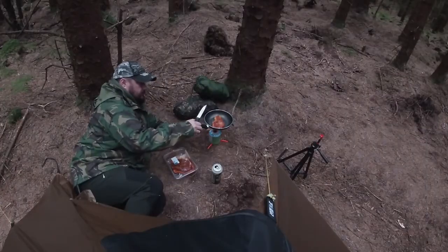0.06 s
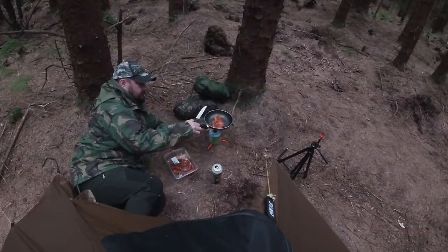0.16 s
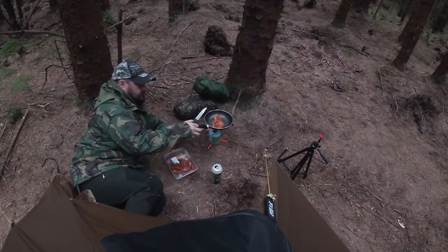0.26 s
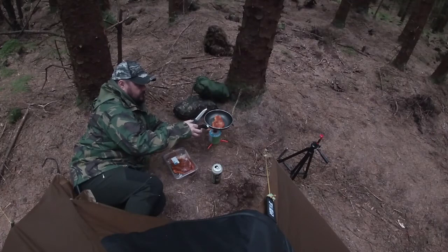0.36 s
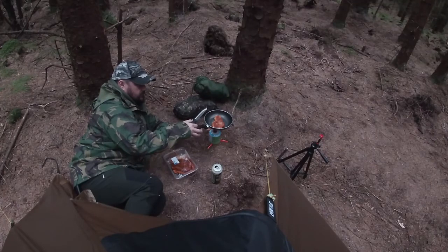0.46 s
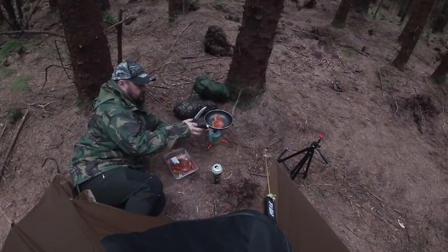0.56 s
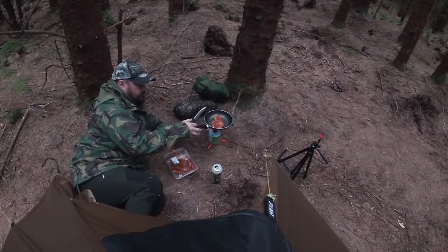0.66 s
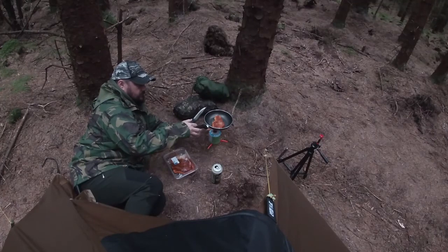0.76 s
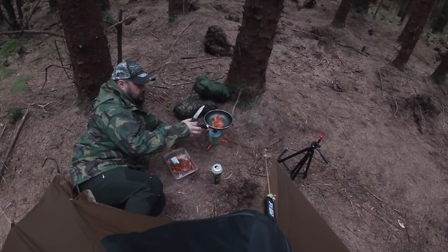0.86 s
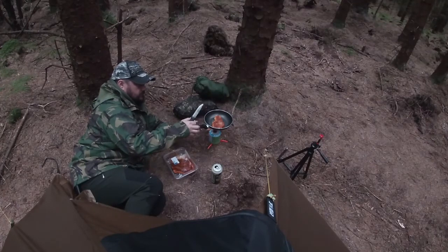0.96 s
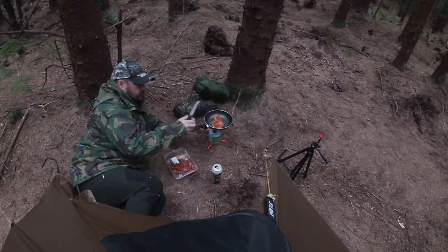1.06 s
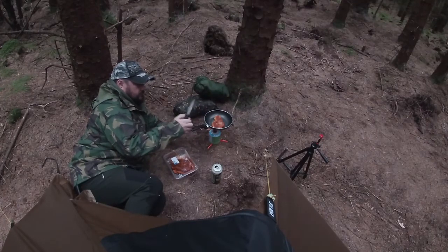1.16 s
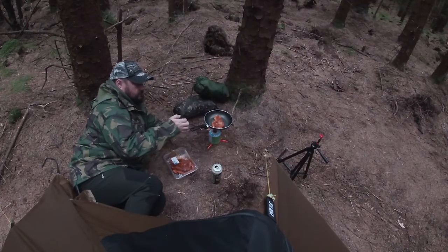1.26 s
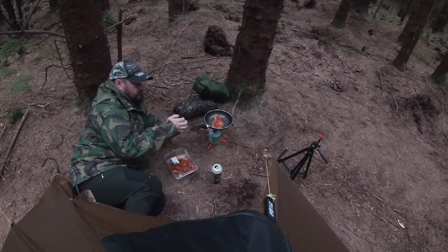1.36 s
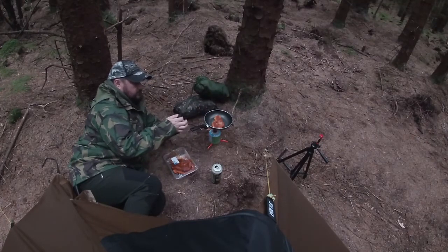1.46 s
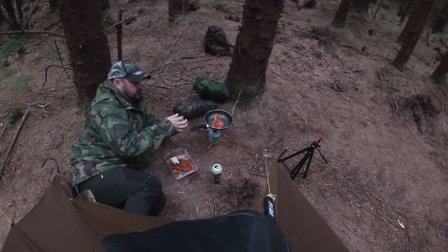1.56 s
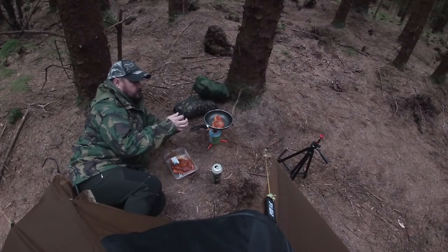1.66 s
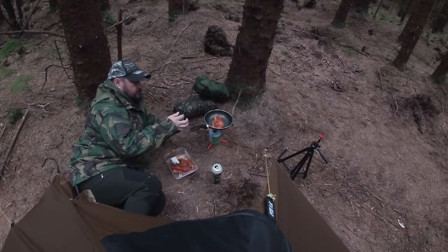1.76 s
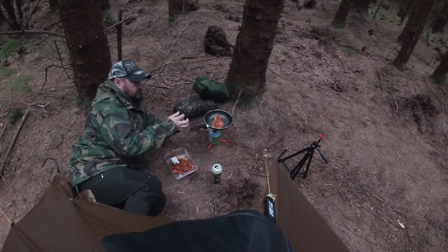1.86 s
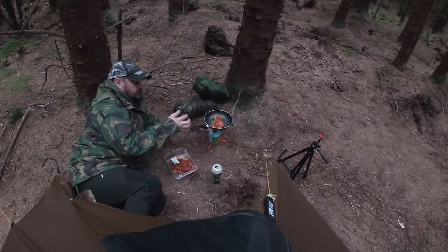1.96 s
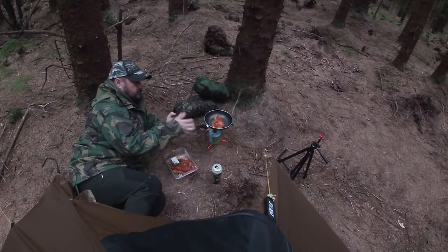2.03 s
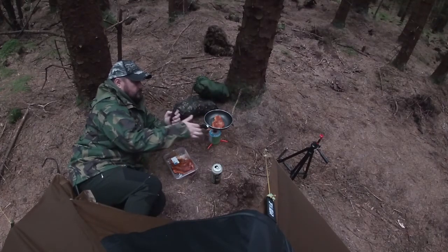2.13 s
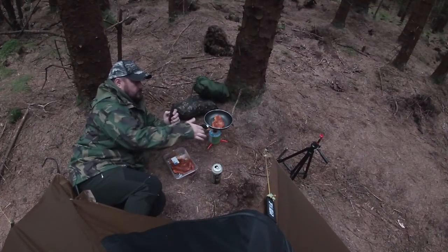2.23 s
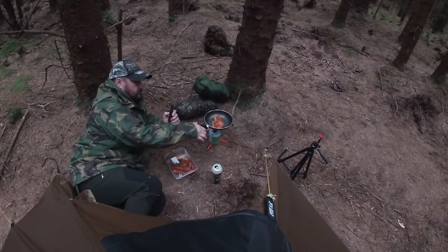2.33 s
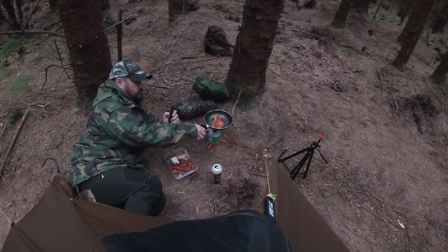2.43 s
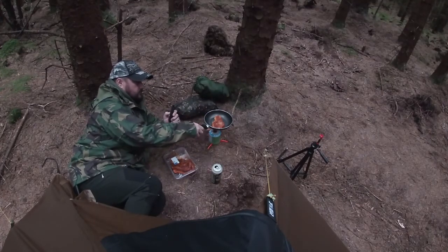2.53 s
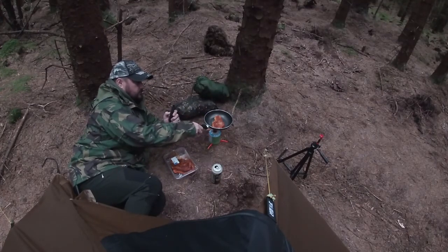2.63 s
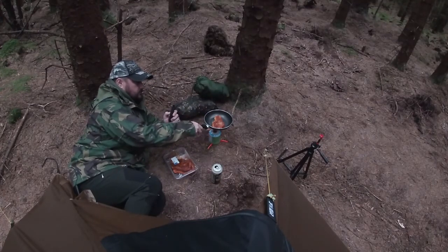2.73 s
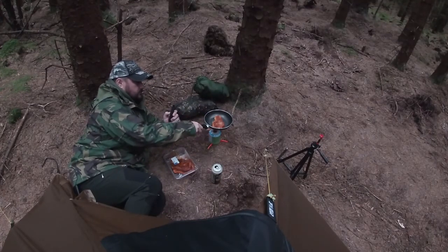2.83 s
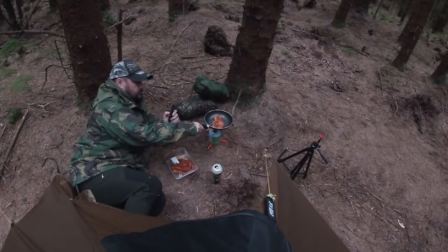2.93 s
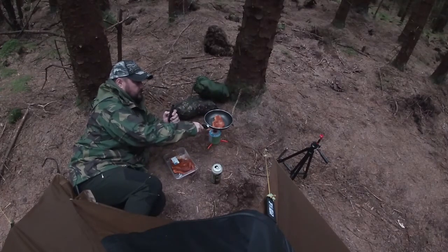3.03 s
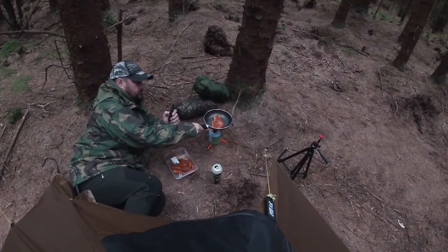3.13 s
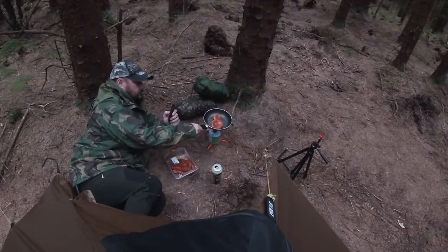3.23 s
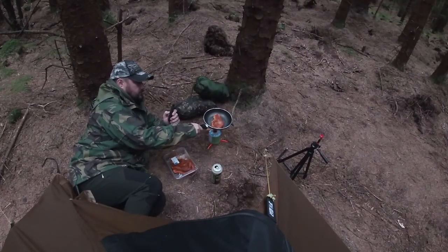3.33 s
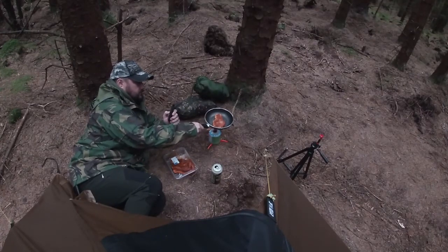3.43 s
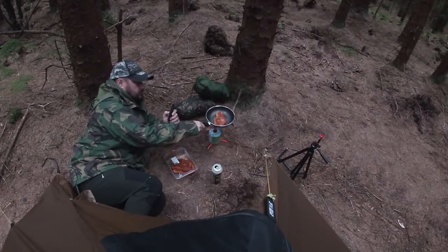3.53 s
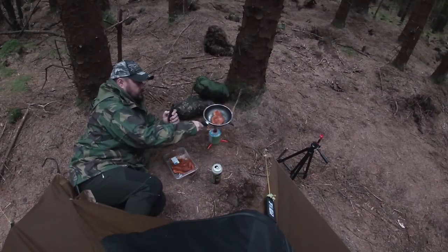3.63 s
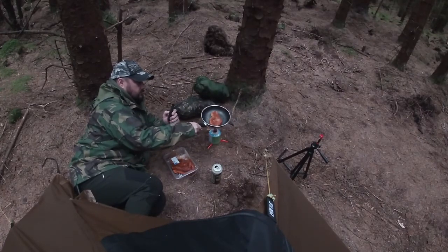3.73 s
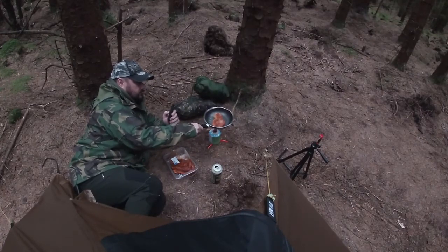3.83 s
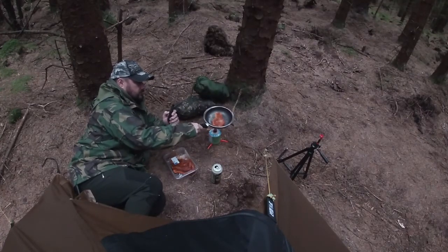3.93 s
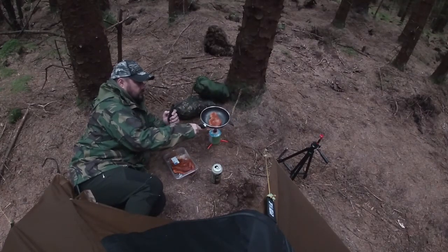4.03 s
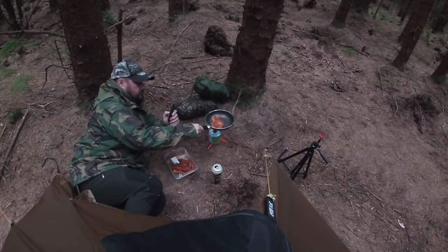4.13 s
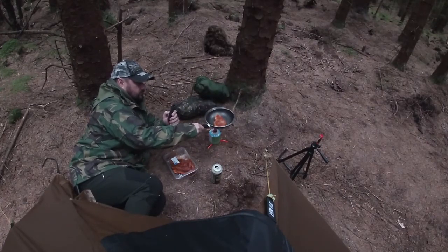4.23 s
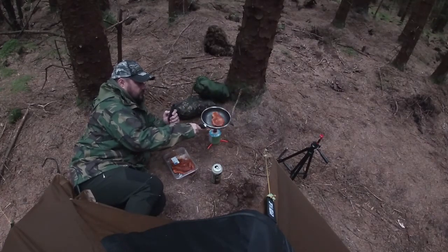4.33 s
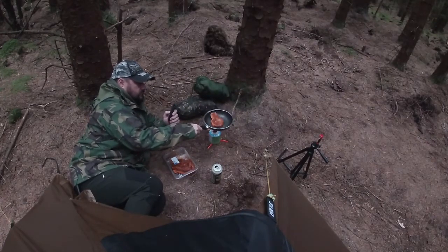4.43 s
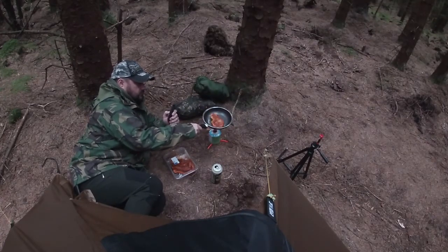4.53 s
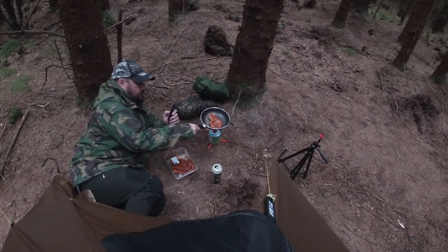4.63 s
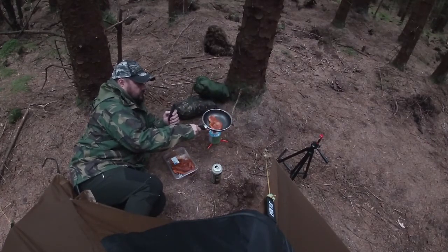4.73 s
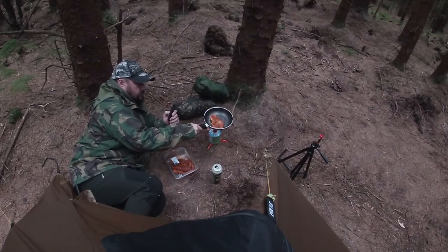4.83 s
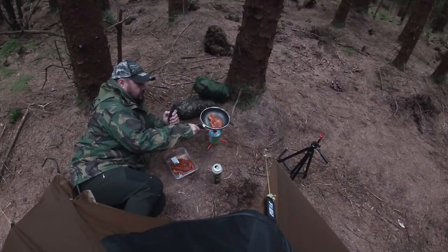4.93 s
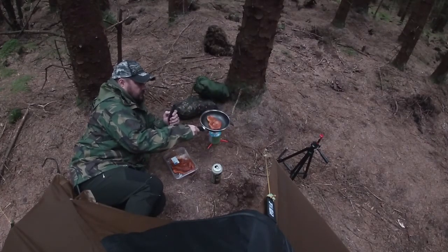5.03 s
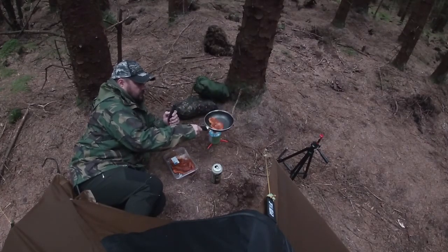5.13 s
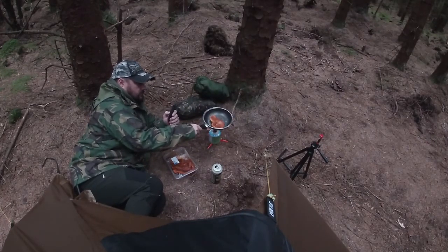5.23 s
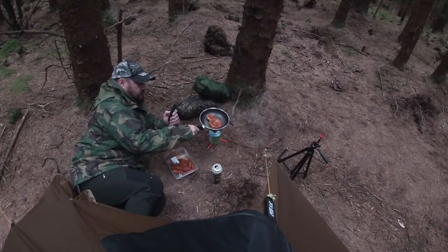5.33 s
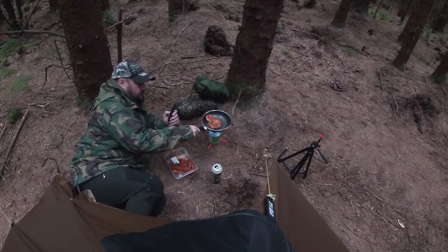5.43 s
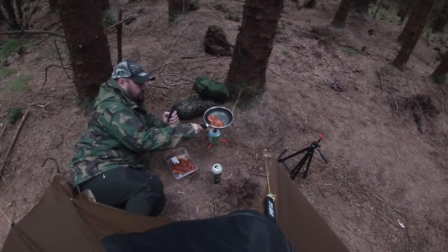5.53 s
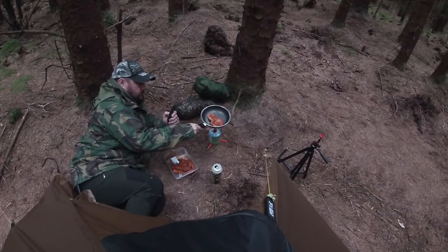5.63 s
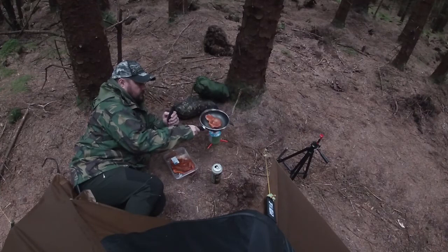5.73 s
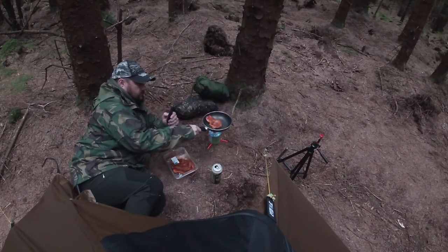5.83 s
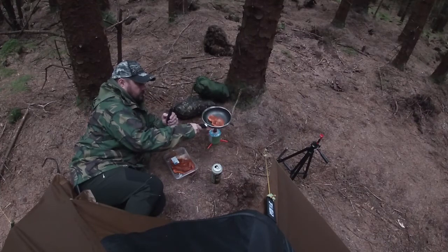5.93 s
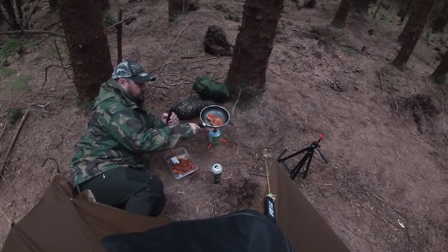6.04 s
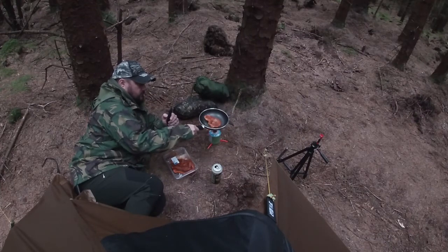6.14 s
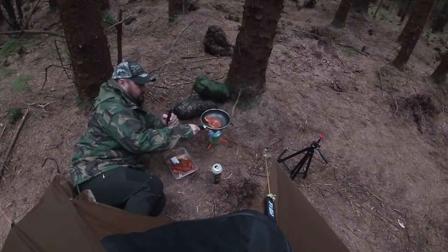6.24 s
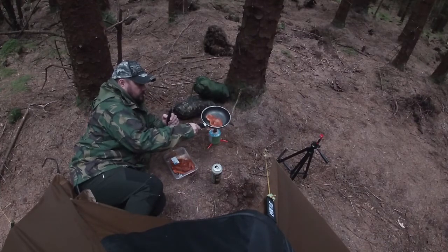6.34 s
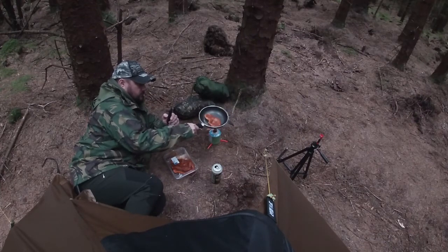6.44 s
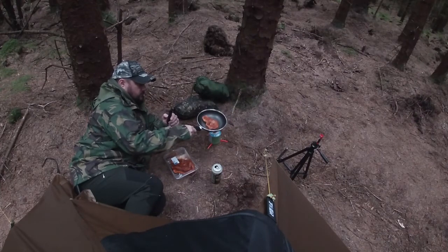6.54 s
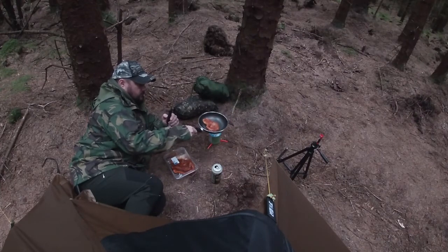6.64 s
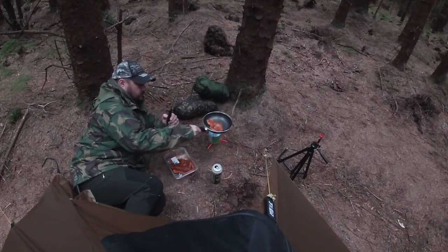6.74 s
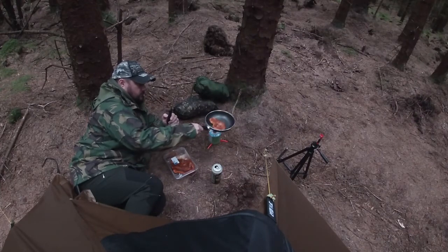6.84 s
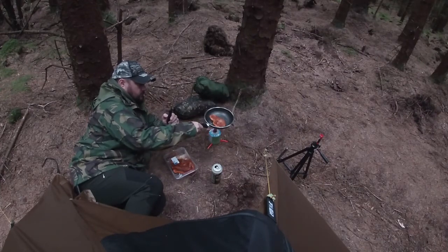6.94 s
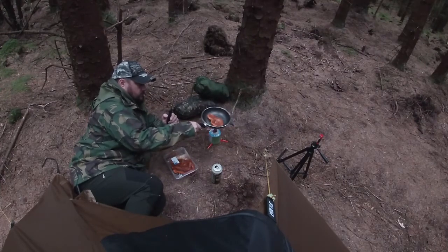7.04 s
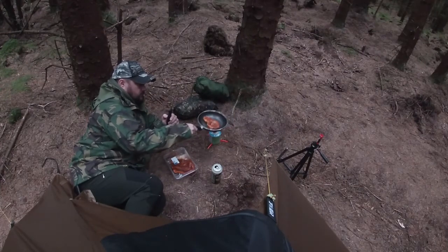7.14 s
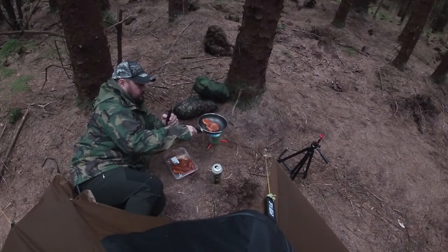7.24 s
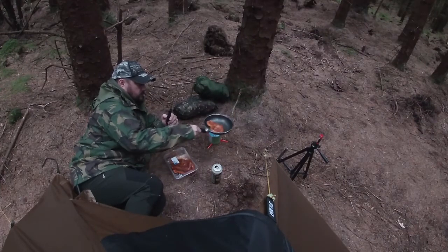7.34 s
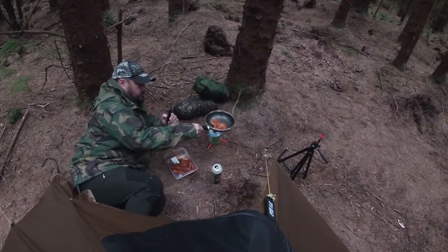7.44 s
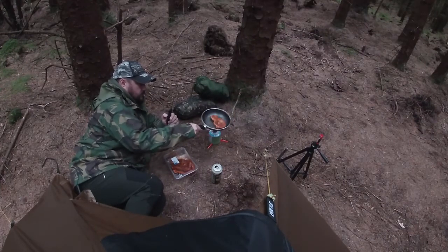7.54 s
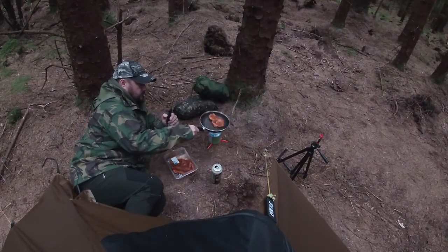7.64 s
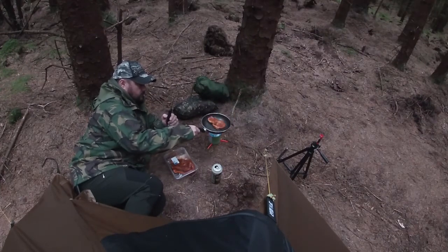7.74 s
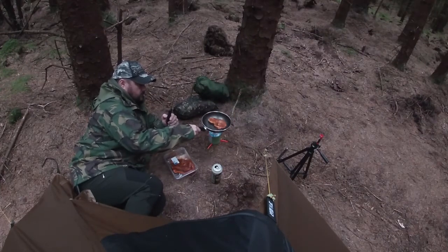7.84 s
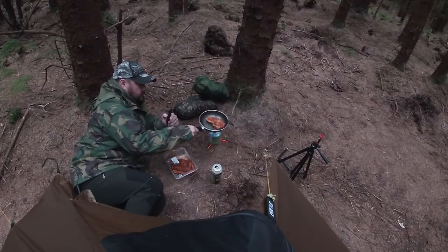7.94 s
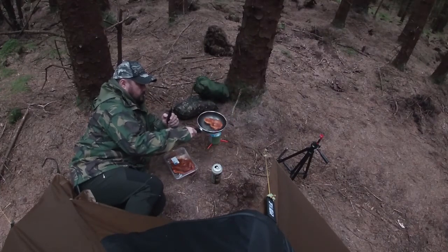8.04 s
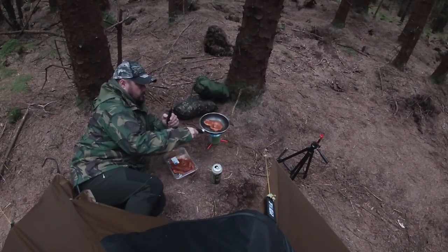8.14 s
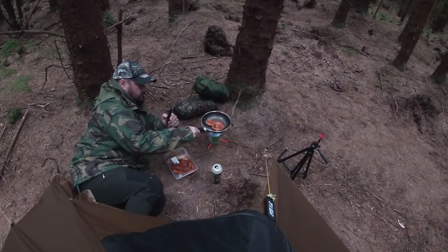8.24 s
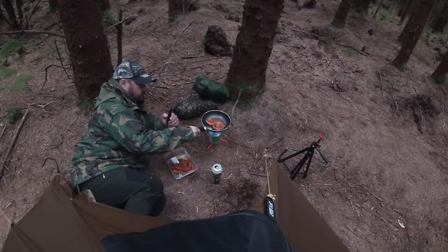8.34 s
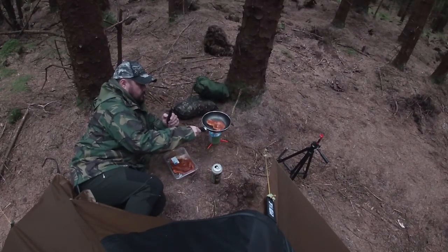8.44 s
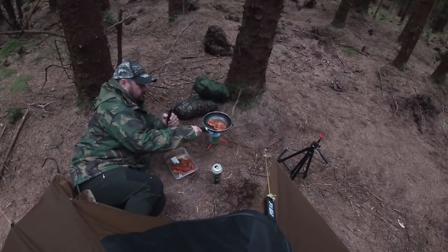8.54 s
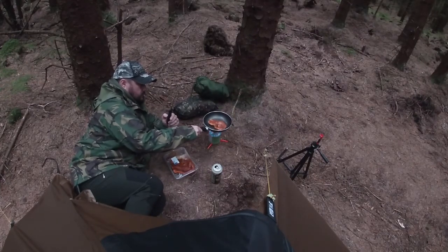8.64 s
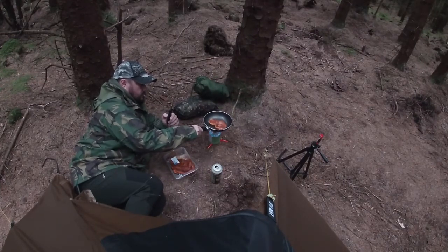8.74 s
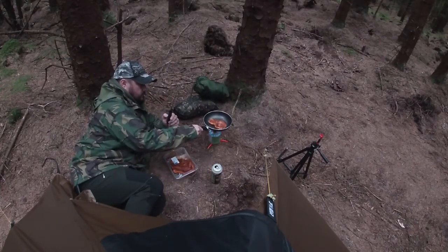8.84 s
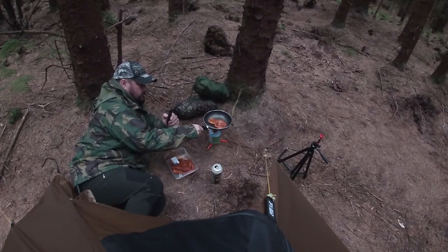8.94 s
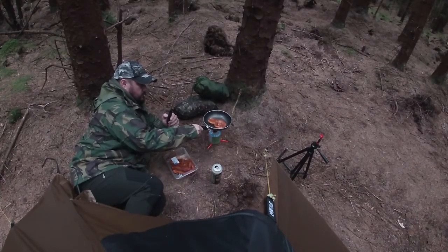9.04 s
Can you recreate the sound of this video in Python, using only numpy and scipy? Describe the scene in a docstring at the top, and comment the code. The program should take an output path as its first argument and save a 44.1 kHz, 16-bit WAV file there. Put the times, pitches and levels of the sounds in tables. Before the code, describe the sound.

A fine bright fizz of hot fat, uneven crackle and crisp single pops, heard up close in a quiet forest. The sizzle begins restrained, with a small early swell, then jumps to a much fuller boil after about four seconds as the pan is shaken, pulsing irregularly with spluttering steam. Later it settles back to lighter frying. A soft gas flame runs underneath, with faint wind rumble on the microphone.

```python
"""Meat frying on a gas stove

Outdoors in a forest, heard by two close microphone ports. Steam bubbles burst in the fat as damped sines:
a dense fizz with a soft band, sparser crackle, loud pops, thin spits, short streams. Fizz, soft band,
crackle and weaker pops surge with the boil as the pan is shaken. The burner's soft roar and the wind's
rumble are filtered noise; short noise tails spread the pan and burner across both ports."""
import sys
import numpy as np
from scipy import signal
from scipy.fft import rfft, irfft, next_fast_len
from scipy.io import wavfile
from scipy.ndimage import uniform_filter1d, map_coordinates

SR = 44100
rng = np.random.default_rng(int(sys.argv[2]) if len(sys.argv) > 2 else 0)


def file_out(sig):
    """Save sig as 16-bit WAV at sys.argv[1]."""
    # one column per channel
    cols = np.atleast_2d(sig).T
    # limit, then scale
    lim = np.clip(cols, -1, 1)
    pcm = np.round(lim * 32767).astype(np.int16)
    wavfile.write(sys.argv[1], SR, pcm)


def attenuation_scalar(level_db):
    """Turn a level in dB into a linear amplitude multiplier (20 dB per decade)."""
    decades = np.asarray(level_db, float) / 20
    return 10 ** decades


N = 400869

# wind puffs on the microphone: (time [s], level [dB])
WIND_DB = [(0.0, -87.5), (0.17, -60), (0.25, -88.5), (0.35, -72), (0.43, -86), (0.88, -79), (1.04, -93),
           (1.19, -64), (1.32, -84), (2.3, -86), (2.45, -70), (2.93, -82), (3.72, -72), (3.77, -89),
           (3.85, -60), (3.9, -80), (4.2, -72), (4.25, -91), (4.73, -90), (5.16, -77), (5.29, -89),
           (5.42, -64), (5.63, -69), (5.7, -54), (5.75, -64), (5.8, -56), (5.89, -62), (5.97, -74),
           (6.1, -80), (6.3, -70), (6.43, -65), (6.53, -82), (6.66, -72), (7.16, -91), (7.37, -65),
           (7.44, -77), (7.8, -70), (7.85, -91), (7.92, -72), (8.5, -89), (8.68, -71), (8.73, -92),
           (9.09, -64)]
# wind rumble spectrum: (frequency [Hz], relative density [dB per Hz])
RUMBLE_DB = [(15, 1), (35, 5), (60, -14), (110, -18), (200, -70)]
# burner flame spectrum: (frequency [Hz], relative density [dB per Hz])
FLAME_DB = [(60, -22.5), (105, -34), (143, -5), (200, 1), (270, -7), (380, -10), (520, -5), (1100, -9.5),
            (2500, -14), (6000, -29.5), (12000, -49.5)]
# slow boil between sloshes: (time [s], large bubbles [relative dB], small bubbles [relative dB])
BOIL_DB = [(0, -45, -53.5), (1.5, -46.5, -52.5), (3.5, -46.5, -55.5), (4.03, -49.5, -54.5),
           (4.2, -40, -44.5), (4.7, -37, -42.5), (6, -43.5, -43.5), (6.8, -42, -43.5), (7.66, -46, -48),
           (8.1, -44.5, -49.5), (8.5, -47.5, -49.5), (9.09, -50.5, -52)]
# fat sloshing over hot metal as the pan rocks:
# (middle [s], half length [s], large-bubble swell [dB], small-bubble swell [dB])
SLOSHES = [(0.317, 0.23, -0.5, 3.5), (3.83, 0.081, 3.5, 7.5), (4.12, 0.035, 3.5, -3), (4.3, 0.064, 4, 7.5),
           (4.556, 0.055, 3.5, 5.5), (4.647, 0.025, 5, 1), (4.92, 0.14, 0.8, 5), (5.13, 0.041, 1, 1),
           (5.268, 0.09, 2.5, 3), (5.552, 0.12, 3.5, 1.5), (5.895, 0.11, 4, -1), (6.305, 0.21, 3, 1.5),
           (6.629, 0.02, 6, 3.5), (7.03, 0.029, -1.5, 6), (7.286, 0.066, 2.5, -0.5), (7.51, 0.07, 3.5, 2),
           (7.81, 0.092, 2, 4), (8.29, 0.13, 2, 1.5)]
# colour from pan, ground and microphone: (frequency [Hz], gain [dB])
SIZZLE_DB = [(450, -28), (800, -8), (1150, -13), (1400, -4.5), (1640, -1.26), (1840, -4), (2200, -2.5),
             (2850, -2.66), (3400, -3), (4050, -3.5), (4450, -5.5), (5000, -3), (5300, 1), (5750, 1),
             (6500, -2.5), (9200, -19), (11000, -23), (13300, -20.5), (16000, -26)]
# fizz colour ahead of SIZZLE_DB, weaker at both ends: (frequency [Hz], gain [dB])
FIZZ_TINT_DB = [(1200, -2.5), (2200, 3.8), (8000, 4.9), (12000, 3.5)]
# smallest droplets: (time [s], peak [dB])
SPITS = [(2.107, -36), (2.322, -40), (2.579, -36), (2.639, -46), (2.6728, -44), (2.705, -34),
         (2.784, -31.5), (3.658, -35), (5.0958, -48), (5.121, -39), (6.2018, -45), (6.6034, -31),
         (8.2347, -40), (8.333, -29), (8.3873, -44)]
# steam escaping from under the meat: (middle [s], length [s], pitch [Hz], typical bubble peak [dB])
STREAMS = [ (2.693, 0.023, 3360, -43.5), (4.12, 0.034, 2540, -40), (4.147, 0.017, 5670, -40),
           (4.26, 0.032, 5800, -49), (4.343, 0.017, 2800, -39), (4.549, 0.057, 3200, -31),
           (4.889, 0.058, 5900, -29), (5.125, 0.036, 2960, -37.5), (5.15, 0.015, 2100, -42),
           (5.3, 0.083, 5800, -36), (5.547, 0.055, 2920, -36), (5.853, 0.028, 2170, -43),
           (6.269, 0.019, 2840, -43), (6.314, 0.023, 2780, -46), (7.323, 0.027, 2730, -43.5),
           (7.757, 0.024, 3220, -37.5), (7.787, .025, 3050, -43), (7.816, 0.025, 2630, -42),
           (7.85, 0.03, 2930, -37.5), (8.277, 0.055, 3430, -40), (8.34, 0.048, 3300, -36.5),
           (8.967, 0.028, 3000, -42), (8.968, 0.02, 5500, -41.5), (9.049, 0.055, 3340, -45)]
# loud single bursts: (time [s], peak before colouring [dB], pitch [Hz], life [cycles])
POPS = [(0.128, -26, 2550, 1.3), (0.161, -25, 2500, 0.98), (0.232, -26, 3850, 1.7), (0.252, -18, 3620, 1.4),
        (0.2676, -23, 3400, 1.8), (0.3144, -22, 3840, 1.3), (0.348, -24, 4500, .6), (0.375, -21, 5800, 1.2),
        (0.3906, -19.5, 4870, 0.83), (0.476, -18.5, 4430, 0.42), (0.534, -21, 4000, .6),
        (0.5447, -25, 2500, 1.7), (0.56, -26, 4120, 3.2), (0.665, -18, 4500, 1.1), (.7289, -22, 2700, 1.3),
        (0.7342, -19, 2720, 0.98), (0.7714, -21.5, 4820, 1.3), (0.8977, -13, 5790, 0.32),
        (0.782, -25, 2840, 0.99), (0.9455, -29, 2660, 0.9), (0.987, -24.5, 5800, 1.8),
        (1.105, -28, 2470, 0.95), (1.1195, -24, 2200, 1.3), (1.247, -27, 2280, 1.1),
        (1.2836, -15.5, 3120, 0.23), (1.301, -27, 4600, 1.6), (1.448, -20, 3500, 0.59),
        (1.4805, -28, 3600, .9), (1.586, -26, 3000, 1.2), (1.605, -23.5, 3000, 2.4),
        (1.779, -22, 4730, 1.3), (1.8248, -15.5, 3660, 0.65), (2.0805, -26, 4690, 1),
        (2.094, -25, 3700, 0.83), (2.245, -24, 3500, 0.65), (2.256, -23, 4150, 0.82),
        (2.279, -22.5, 5200, 0.7), (2.37, -20.5, 4170, .7), (2.53, -26, 3020, 1.2),
        (2.513, -23.5, 5280, 1.1), (2.5876, -26, 3340, 1.6), (2.61, -25, 3200, 1.9),
        (2.6895, -27, 3230, 2.3), (2.9745, -17, 2500, 0.3), (3.206, -28, 2410, 1), (3.269, -22, 2770, 0.87),
        (3.395, -24, 4760, 0.71), (3.468, -26.5, 2670, 1.1), (3.4998, -24, 3800, 1.7),
        (3.569, -19, 5410, 0.54), (3.604, -19.5, 5470, 0.82), (3.645, -22, 2440, 0.75),
        (3.6585, -17, 4950, 2.6), (3.7388, -25, 3070, 1.2), (3.7563, -16.5, 4700, 0.47),
        (3.8072, -13.5, 5830, 0.35), (3.8407, -21, 3360, 2.2), (3.8574, -19, 5610, 1.3),
        (3.9567, -17, 5340, 0.5), (3.98, -24, 5500, 1.2), (4.132, -22, 3680, 0.92), (4.214, -25, 3500, .7),
        (4.241, -16.5, 5840, 1.2), (4.526, -20, 5150, .8), (4.539, -17, 3620, 1.1), (4.5582, -18, 3800, .8),
        (4.58, -15, 3700, 1.4), (4.7728, -12, 4440, 0.78), (4.88, -12.5, 4040, 0.39),
        (5.216, -18, 5450, 0.87), (5.528, -15, 2940, 0.98), (5.806, -13, 6300, 1.3),
        (5.8322, -21, 6400, 1.2), (5.923, -13, 3960, 0.29), (6.184, -19.5, 6360, 2.2),
        (6.277, -13, 4850, 0.34), (6.343, -20, 5800, 1.3), (6.605, -14.5, 5800, 0.92),
        (6.636, -16.5, 6040, 1.9), (7.1261, -15.5, 5640, 1.8), (7.175, -25, 2600, 0.82),
        (7.2482, -19.5, 6300, 2.8), (7.258, -22, 4540, .9), (7.2653, -23, 4990, .9),
        (7.525, -18.5, 5500, 1.3), (7.634, -26, 5500, 1), (7.7233, -20.5, 6200, 1.7),
        (7.8037, -18, 4360, 0.46), (7.8939, -26, 3010, 1.1), (8.07, -18, 2350, 0.38),
        (8.081, -22.5, 2870, 0.92), (8.158, -18.5, 3750, 0.62), (8.2097, -18.5, 5230, 0.72),
        (8.2363, -18, 5190, 0.65), (8.257, -23, 4650, 0.83), (8.287, -24, 4500, .9),
        (8.546, -21, 4200, 0.5), (8.593, -24, 3400, 0.45), (8.595, -22, 6840, 1.5), (8.624, -24, 5830, 1.5),
        (8.636, -27, 3300, 0.78), (8.706, -19, 3480, 2), (8.783, -20, 5070, 0.68), (8.815, -24, 4100, 1),
        (8.8398, -27, 3590, 3.1), (8.8656, -29, 3350, 1), (8.869, -23.5, 3600, 2.7),
        (9.021, -24, 4810, 1.5)]
# diffuse sound, spread across both ports: (frequency [Hz], gain re pan and burner [dB])
DIFFUSE_DB = [(150, -60), (350, -45), (700, -30), (1500, -37), (4000, -13), (6000, -12.5), (8500, -9.5),
              (13000, -18.5)]


def unit(x):
    """Scale to rms 1."""
    return x / np.sqrt(np.mean(x ** 2) + 1e-20)


def along(points, hz):
    """Interpolate (Hz, value) points on a log-frequency axis."""
    point_hz, values = np.transpose(points)
    return np.interp(np.log(hz + 1), np.log(point_hz + 1), values)


def curves(rows):
    """Interpolate each column after the time to one value per sample."""
    time_s, *columns = np.transpose(rows)
    return [np.interp(np.arange(N) / SR, time_s, column) for column in columns]


def wobble(knots_per_s):
    """Smooth random curve: a spline through Gaussian knots."""
    knots = rng.standard_normal(N // 100)
    return map_coordinates(knots, [np.arange(N) * knots_per_s / SR])


def filtered(x, response):
    """Multiply the spectrum of x by a complex response of frequency."""
    size = next_fast_len(N + SR // 2)
    spectrum = rfft(x, size) * response(np.fft.rfftfreq(size, 1 / SR))
    return irfft(spectrum, size)[..., :N]


def coloured(x, points):
    """Minimum-phase filter with the given gain curve, built by folding the cepstrum."""
    gain_db = along(points, np.fft.rfftfreq(4096, 1 / SR))
    cepstrum = irfft(np.log(attenuation_scalar(gain_db)))
    cepstrum[1:2048] *= 2
    cepstrum[2049:] = 0
    impulse = irfft(np.exp(rfft(cepstrum)))
    return signal.fftconvolve(x, impulse)[:N]


def bursts(time_s, peak, hz, cycles, rise):
    """Damped sines: swell over `rise` cycles, decay to 1/e in `cycles`, cut at 160 samples."""
    k = np.arange(160)
    turns = hz[:, None] * k / SR
    envelope = (1 - np.exp(-turns / rise)) * np.exp(-turns / cycles[:, None])
    shape = envelope * np.sin(2 * np.pi * turns)
    shape *= (peak / np.abs(shape).max(axis=1))[:, None]
    index = np.round(time_s * SR).astype(int)[:, None] + k
    return np.bincount(index.ravel(), shape.ravel(), N + SR)[:N]


def wind():
    """Wind: low noise in lumpy puffs, equal on both ports."""
    rumble = filtered(rng.standard_normal(N), lambda hz: attenuation_scalar(along(RUMBLE_DB, hz)))
    lumps_db = 0.8 * wobble(9.9) + 0.86 * wobble(2.9)
    return attenuation_scalar(curves(WIND_DB)[0]) * unit(rumble * attenuation_scalar(lumps_db))


def burner():
    """Gas flame: steady low noise with slight flutter."""
    roar = filtered(rng.standard_normal(N), lambda hz: attenuation_scalar(along(FLAME_DB, hz)))
    return attenuation_scalar(-53.5 + 0.62 * wobble(8.2)) * unit(roar)


def boil():
    """Boil curves [dB] for large and small bubbles: slow boil plus a swell per slosh."""
    middle_s, half_s, *swells_db = np.transpose(SLOSHES)
    t = np.arange(0, N / SR + .01, .002)
    edge = 6.4  # higher = flatter top, steeper sides
    swell = np.exp(-np.abs((t - middle_s[:, None]) / half_s[:, None]) ** edge * np.log(2))
    slosh_rows = np.c_[t, (np.array(swells_db) @ swell).T]
    return np.array(curves(BOIL_DB)) + curves(slosh_rows)


def boiling(x, follow, offset_db, sputter_db):
    """Split x by bubble size; each part follows its boil curve and sputters independently."""
    split_hz = 5120  # large bubbles ring below, small ones above
    large_db, small_db = boil()

    def split(hz):
        high = 1 / (1 + (split_hz / (hz + 1)) ** 8)
        return [1 - high, high]

    def level(db):
        followed_db = np.mean(db) + follow * (db - np.mean(db))
        return attenuation_scalar(offset_db + followed_db + sputter_db * wobble(30))

    low_part, high_part = filtered(coloured(x, SIZZLE_DB), split)
    return level(large_db) * unit(low_part) + level(small_db) * unit(high_part)


def bubbles(count, spread_db, cap_db, cycles):
    """Random bursts, log-even pitches; spread_db above 0 makes a few much stronger."""
    when, pitch, luck, life = rng.random((count, 4)).T
    hz = 900 * 16 ** pitch
    boost_db = np.minimum(-spread_db * np.log(luck + 1e-9), cap_db)
    peak = hz * attenuation_scalar(boost_db)  # equal energy per Hz
    return bursts(when * N / SR, peak, hz, cycles * (.5 + life), rise=0.21)


def patchy(x, depth_db):
    """Random gain patches, about 1.4 kHz by 15 ms."""
    z = signal.stft(x, nperseg=256)[2]
    field = uniform_filter1d(rng.standard_normal(z.shape), size=8, axis=0)
    field = uniform_filter1d(field, size=5, axis=1)
    return signal.istft(z * attenuation_scalar(depth_db * unit(field)), nperseg=256)[1][:N]


def spits():
    """Smallest droplets: thin, bright, very short snaps."""
    time_s, peak_db = np.transpose(SPITS)
    hz = 8200 * np.exp(0.11 * rng.standard_normal(len(time_s)))
    return bursts(time_s, attenuation_scalar(peak_db), hz, np.full(len(time_s), 2.4), rise=3.9)


def streams(count=24):
    """Escaping steam: quick runs of bubbles near one pitch, densest mid-run."""
    middle_s, length_s, hz, peak_db = np.transpose(STREAMS)[:, :, None]
    draws = rng.standard_normal((len(STREAMS), count, 3))
    when, pitch, size = np.moveaxis(draws, 2, 0)
    time_s = np.clip(middle_s + 0.36 * length_s * when, 0, N / SR)
    peak = attenuation_scalar(peak_db + 3.4 * size)
    bubble_hz = hz * np.exp(.06 * pitch)
    return bursts(time_s.ravel(), peak.ravel(), bubble_hz.ravel(), np.full(time_s.size, 2.8), rise=0.64)


def seethe(count=4000):
    """Small bubbles of about one size: a soft band that rises in pitch with the boil."""
    common_hz, hz_per_db, spread = 5750, 40, 0.024  # pitch at mean boil, rise, log spread
    small_db = boil()[1]
    when, (pitch, size) = rng.random(count), rng.standard_normal((count, 2)).T
    effort_db = small_db[(when * N).astype(int)] - small_db.mean()
    hz = (common_hz + hz_per_db * effort_db) * np.exp(spread * pitch)
    swarm = bursts(when * N / SR, attenuation_scalar(3.3 * size), hz, np.full(count, 3.5), rise=0.39)
    return attenuation_scalar(small_db - 15 + 1.2 * wobble(7.2)) * unit(swarm)


def lesser_pops(count):
    """Weaker pops at random times, stronger with the boil: rows of time, peak dB, Hz, cycles."""
    when, (size, pitch, life) = rng.random(count), rng.standard_normal((count, 3)).T
    large_db = boil()[0]
    effort_db = large_db[(when * N).astype(int)] - large_db.mean()
    peak_db = -35.5 + 1.0 * effort_db + 2.5 * size
    return [when * N / SR, peak_db, 3800 * np.exp(.4 * pitch), 0.57 * np.exp(1.64 * life)]


def splatter(time_s, peak_db, hz, cycles):
    """Three weaker bursts crowd round each pop."""
    spread_s, drop_db = .008, -16
    late, size, pitch = rng.standard_normal((len(time_s), 3, 3)).T
    drops = [np.maximum(time_s + spread_s * (late + .6), 0),
             attenuation_scalar(peak_db + drop_db + 1.9 * size),
             hz * np.exp(.25 * pitch),
             cycles + 0 * late]
    return bursts(*[np.ravel(column) for column in drops], rise=0.49)


def echo(time_s, peak_db, hz, cycles):
    """Weaker echo of each pop about 2 ms later, its delay and level varying."""
    delay_s, drop_db = .0019, -13
    wait, size = rng.standard_normal((len(time_s), 2)).T
    echo_s = time_s + delay_s * np.exp(.3 * wait)
    return bursts(echo_s, attenuation_scalar(peak_db + drop_db + 2.4 * size), hz, cycles, rise=0.42)


def pops():
    """Single bursts ring at their pitch, short-lived ones as broad cracks; echo and splatter added."""
    time_s, peak_db, hz, cycles = pop = np.hstack([lesser_pops(750), np.transpose(POPS)])
    first = bursts(time_s, attenuation_scalar(peak_db), hz, cycles, rise=0.22)
    return coloured(first + echo(*pop) + splatter(*pop), SIZZLE_DB)


def crackle():
    """Fewer bursts of very uneven strength; they grow less than the fizz when the fat surges."""
    swarm = bubbles(count=12000, spread_db=4.4, cap_db=14.0, cycles=0.8)
    return boiling(swarm, follow=0.48, offset_db=-5.0, sputter_db=1.0)


def fizz():
    """Thousands of tiny bubbles a second plus noise merge into a patchy hiss."""
    swarm = unit(bubbles(count=24000, spread_db=0.0, cap_db=11, cycles=0.96))
    hiss = swarm + 0.88 * rng.standard_normal(N)
    hiss = filtered(hiss, lambda hz: attenuation_scalar(along(FIZZ_TINT_DB, hz)))
    return boiling(patchy(hiss, depth_db=1.37), follow=1.226, offset_db=-6.0, sputter_db=0.9)


def diffuse(x, t60_s):
    """Three independent smears of x: decaying noise tails, redrawn every 50 ms."""
    step = SR // 20
    decay = attenuation_scalar(-60 * np.arange(step) / SR / t60_s)
    smeared = np.zeros((3, N + 2 * step))
    for start in range(0, N, step):
        tails = rng.standard_normal((3, step)) * decay / np.linalg.norm(decay)
        part = signal.fftconvolve(x[None, start:start + step], tails, axes=1)
        smeared[:, start:start + part.shape[1]] += part
    return smeared[:, :N]


def ports(x, lag_s, t60_s, tail_db):
    """Left port lags right; one short tail joins the direct sound, two spread across both ports."""
    lag_fades_below_hz = 1800
    direct_fades_above_hz = 12300  # leaves diffuse treble

    def direct(hz):
        phase = np.pi * hz * lag_s * hz / np.hypot(hz, lag_fades_below_hz)
        return np.exp(np.outer([-1j, 1j], phase)) / (1 + (hz / direct_fades_above_hz) ** 4)

    smeared = diffuse(x, t60_s)
    ahead = x + attenuation_scalar(tail_db) * smeared[0]
    shared, sideways = filtered(smeared[1:], lambda hz: attenuation_scalar(along(DIFFUSE_DB, hz)))
    return filtered(ahead, direct) + [shared + sideways, shared - sideways]


def scene():
    """Pan and stove through the ports, wind on the microphone."""
    pan = fizz() + seethe() + crackle() + pops() + spits() + streams()
    return ports(pan + burner(), lag_s=2.2e-5, t60_s=0.015, tail_db=-13.5) + wind()


def roll_off(x):
    """The treble ends steeply here."""
    return signal.sosfilt(signal.butter(12, 15690, fs=SR, output="sos"), x)


def record(dry):
    """Finish the stereo mix."""
    return roll_off(dry)


dry = scene()
out = record(dry)
file_out(out)
```